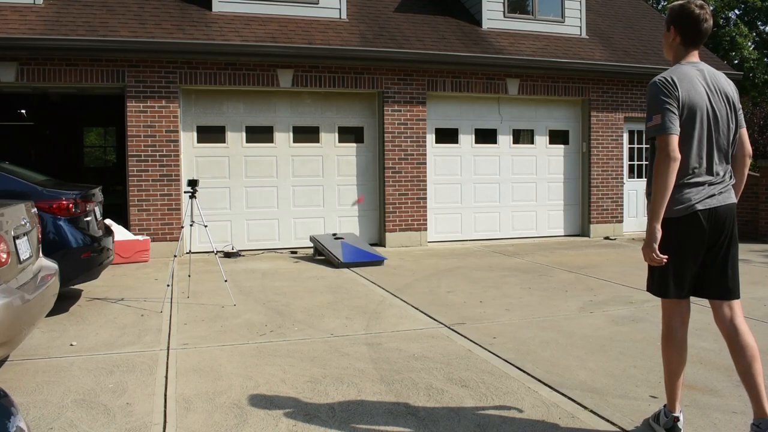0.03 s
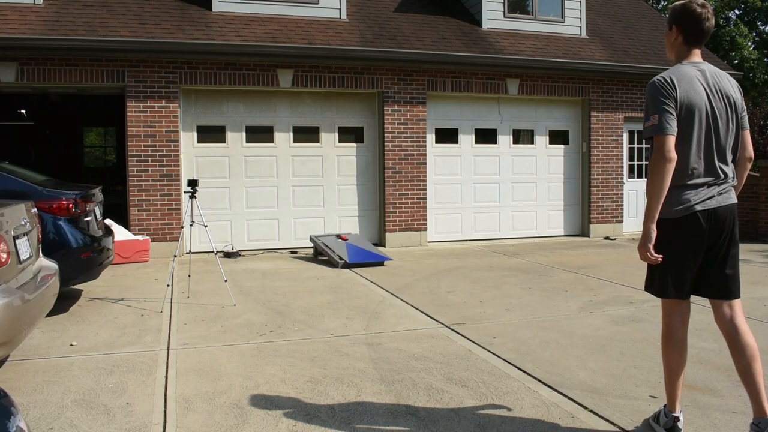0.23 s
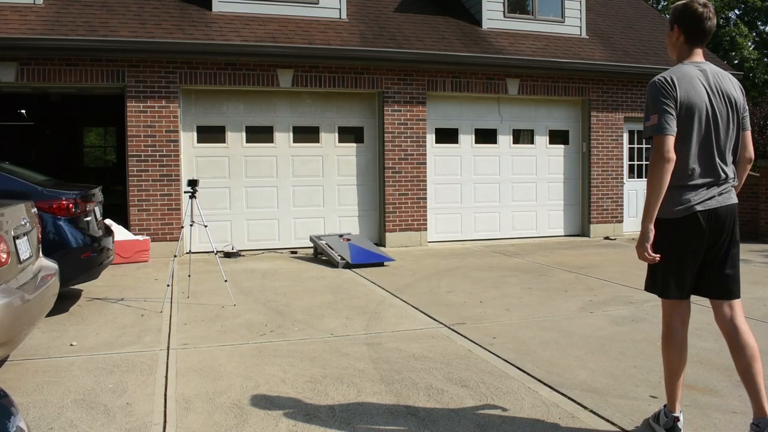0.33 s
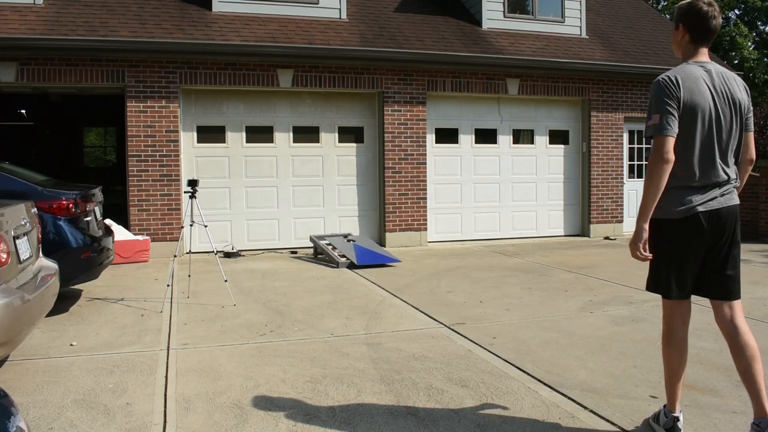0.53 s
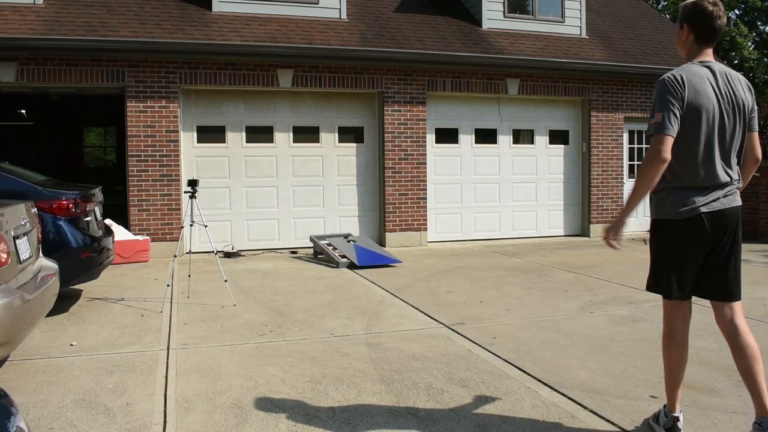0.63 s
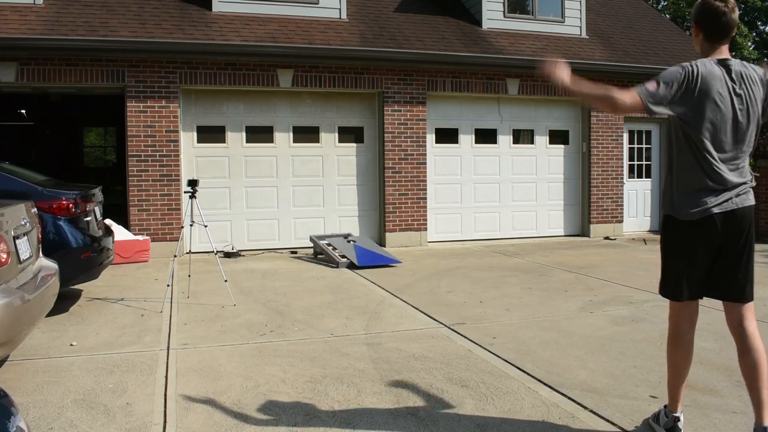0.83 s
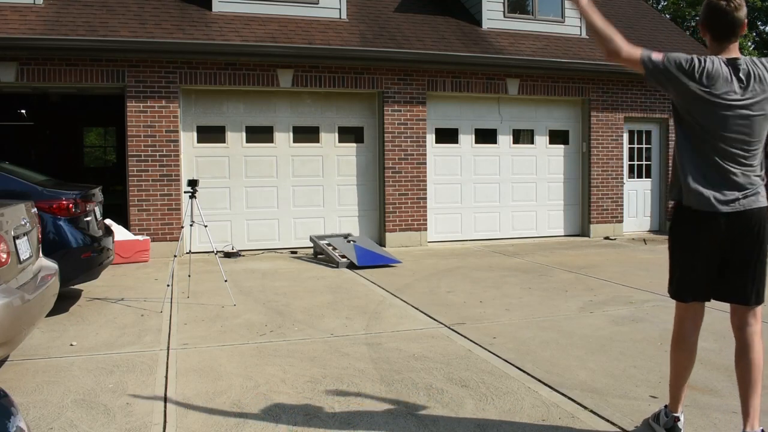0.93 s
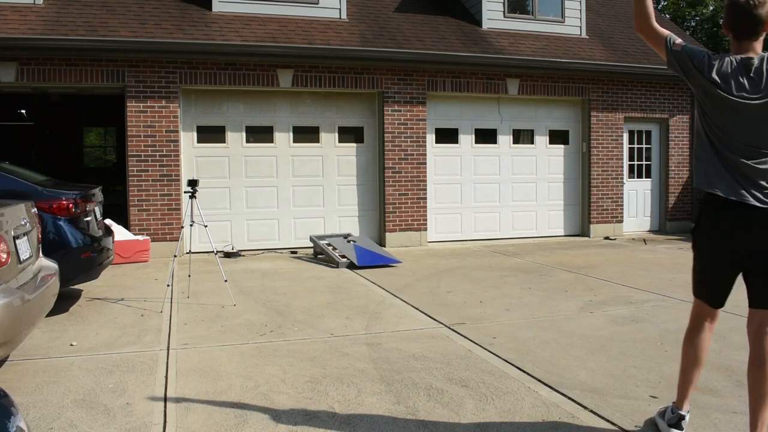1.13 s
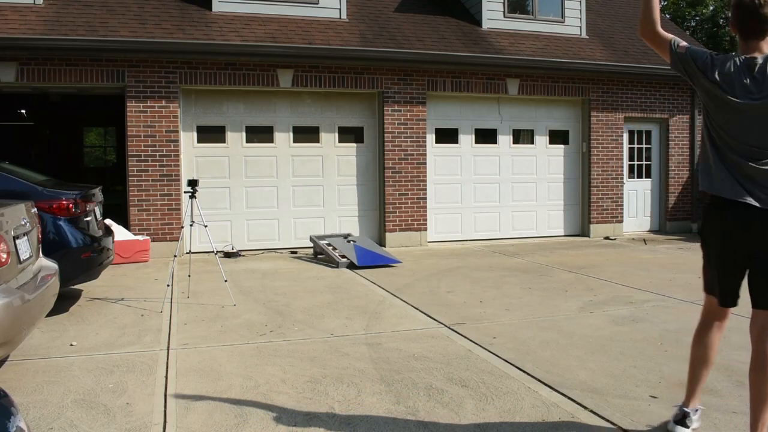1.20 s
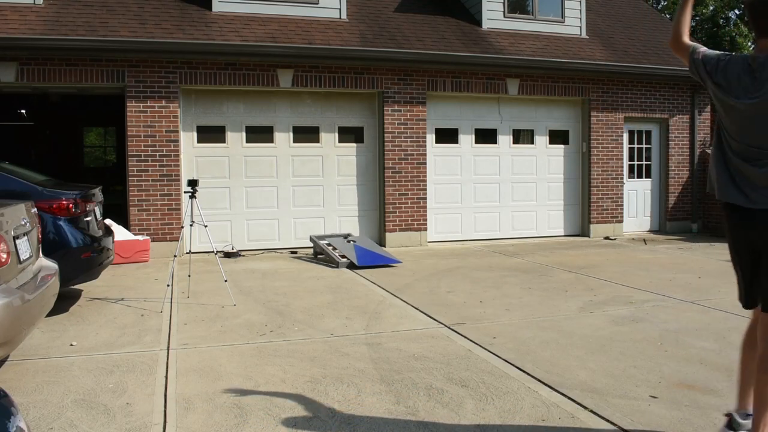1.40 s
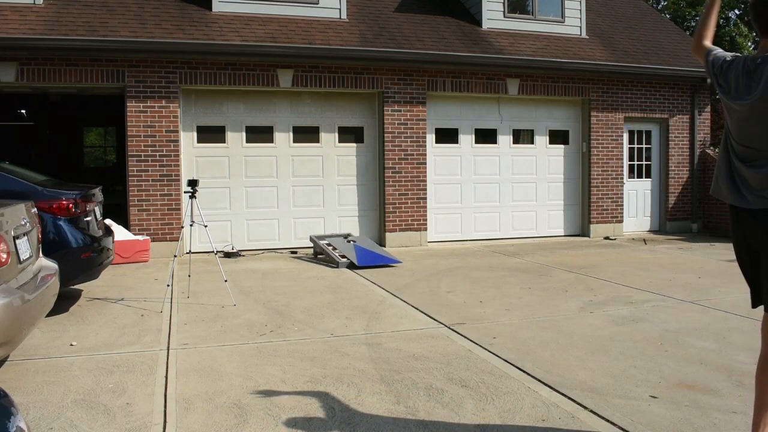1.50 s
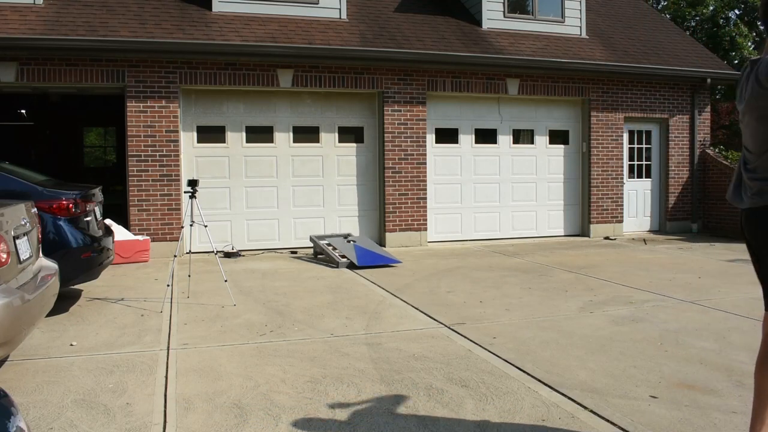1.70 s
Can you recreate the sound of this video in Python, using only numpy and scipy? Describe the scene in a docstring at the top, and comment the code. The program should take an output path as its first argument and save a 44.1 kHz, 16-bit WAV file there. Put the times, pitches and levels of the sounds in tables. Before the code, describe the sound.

A bean bag lands on a hollow wooden board with a sharp slap that echoes briefly off a house. Softer knocks and a short slide follow, then faint distant birds and two soft footsteps in quiet driveway air.

```python
"""Over quiet outdoor air, a bean bag slaps a hollow wooden board on a driveway: the cloth cracks,
the filling thuds, the board rings and the house front answers. Softer knocks follow, pellets tick
and the bag slides briefly. As the knocks end, small birds start whistling far off.
Shoes pad softly twice, and the air sinks away."""
import sys
import numpy as np
from scipy import signal
from scipy.fft import rfft, irfft, next_fast_len
from scipy.io import wavfile
from scipy.ndimage import uniform_filter1d, minimum_filter1d, map_coordinates

SR = 44100
rng = np.random.default_rng(int(sys.argv[2]) if len(sys.argv) > 2 else 0)


def waveform_to_disk(signal):
    """Save audio, clipped to [-1, 1], as 16-bit WAV at the path in sys.argv[1]."""
    frames = np.transpose(np.atleast_2d(signal))
    scaled = np.clip(frames, -1, 1) * 32767
    samples = np.round(scaled).astype(np.int16)
    wavfile.write(sys.argv[1], SR, samples)


N = 77175
TIME_S = np.arange(N) / SR


def amp(db):
    """Decibels to gain."""
    return 10 ** (np.asarray(db) / 20)


def unit_rms(x):
    """Scale to rms 1."""
    return x / np.sqrt(np.mean(x ** 2) + 1e-20)


def along(points, hz):
    """Interpolate (freq_hz, value) points on a log axis."""
    freq_hz, values = np.transpose(points)
    return np.interp(np.log(hz + 1), np.log(freq_hz + 1), values)


def bell(f, hz, width_oct):
    """Gain of a Gaussian band around hz."""
    return np.exp(-.5 * (np.log2((f + 1) / hz) / width_oct) ** 2)


def wobble(rate_hz):
    """Smooth random curve, rate_hz knots a second."""
    return map_coordinates(rng.standard_normal(1024), [TIME_S * rate_hz], mode="wrap")


def filtered(x, gain):
    """Zero-phase filter with response gain(f)."""
    size = next_fast_len(len(x) + SR // 4)
    return irfft(rfft(x, size) * gain(np.fft.rfftfreq(size, 1 / SR)), size)[:len(x)]


def noise(gain):
    """Coloured noise, rms 1."""
    return unit_rms(filtered(rng.standard_normal(N), gain))


def delayed(x, start_s):
    """Shift x to start_s."""
    return np.pad(x, (round(start_s * SR), 0))[:N]


# Rush envelope: time_s, level_db
RUSH_ENVELOPE = [(0, -46.5), (.2, -47), (.65, -45.5), (.9, -50.5), (1.32, -50.5), (1.47, -53), (1.6, -56),
                 (1.75, -61)]
# Rush spectrum: freq_hz, gain_db
RUSH_SPECTRUM = [(25, -29.5), (100, -8), (200, -1.5), (430, -7), (700, -3), (1000, -2), (1440, -8),
                 (2200, -14), (3500, -18.5), (6500, -23.5), (8500, -24.5), (10000, -30), (16000, -42.5)]
# Rumble spectrum: freq_hz, gain_db
RUMBLE_SPECTRUM = [(20, -29.5), (40, -10.5), (65, -3.5), (100, 1.5), (140, -8), (300, -35), (1000, -61)]
# Hum and hiss: pitch_hz, width_oct, level_db, fade_start_s, fall_db_per_s
FADING_BANDS = [(370, 0.059, -50.5, 0.69, 92), (8800, 0.17, -63.5, 0.59, 48)]
def air():
    """Outdoor rush and low rumble sink together; a faint hum and high hiss fade early."""
    rush_db = np.interp(TIME_S, *np.transpose(RUSH_ENVELOPE))
    rush = amp(rush_db + 0.69 * wobble(rate_hz=15)) * noise(lambda f: amp(along(RUSH_SPECTRUM, f)))
    rumble_db = -60.5 + 0.39 * (rush_db - rush_db.mean())
    out = rush + amp(rumble_db) * noise(lambda f: amp(along(RUMBLE_SPECTRUM, f)))
    for pitch_hz, width_oct, level_db, fade_start_s, fall_db_per_s in FADING_BANDS:
        fall_db = fall_db_per_s * np.maximum(TIME_S - fade_start_s, 0)
        out += amp(level_db - fall_db) * noise(lambda f: bell(f, pitch_hz, width_oct))
    return out


# Echo decay: freq_hz, t60_s
YARD_DECAY = [(100, 0.31), (330, 1), (700, 0.66), (1500, 0.5), (4000, 0.71), (8000, 0.41), (14000, 0.43)]
# Echo spectrum: freq_hz, gain_db
YARD_SPECTRUM = [(60, -9), (150, 5), (300, 0.5), (450, -4), (800, -6.5), (1500, -1), (3000, -1),
                 (5500, 1.5), (8000, -6.5), (12000, 0.5), (16000, -15.5)]
def yard(rise_s=0.0019):
    """Diffuse impulse response of house front and driveway; the low mids last longest."""
    hz, frame_s, spectra = signal.stft(rng.standard_normal(SR), SR, nperseg=256)
    decay = amp(-60 * frame_s / along(YARD_DECAY, hz)[:, None])
    _, tail = signal.istft(spectra * decay, SR, nperseg=256)
    tail *= 1 - np.exp(-TIME_S[:len(tail)] / rise_s)
    tail = np.pad(tail / np.linalg.norm(tail), (0, N))[:N]
    return filtered(tail, lambda f: amp(along(YARD_SPECTRUM, f)))


def echoed(x, echo_db):
    """Direct sound plus yard echo."""
    return x + amp(echo_db) * signal.fftconvolve(x, yard())[:N]


# Whistles: start_s, length_s, start_hz, middle_hz, end_hz, level_db
BIRD_WHISTLES = [(0.806, 0.17, 7400, 7480, 7400, -64), (0.823, .1, 9020, 9100, 8460, -62),
                 (0.984, 0.068, 8460, 8700, 8360, -56), (1.026, 0.087, 7960, 8120, 7700, -59.5),
                 (1.171, 0.091, 8420, 8230, 7900, -61.5), (1.308, 0.096, 8100, 8050, 8120, -63),
                 (1.475, 0.12, 8180, 8290, 8210, -62.5), (1.62, 0.16, 8150, 8110, 7950, -68)]
def birds(waver_hz=58.8, flutter_db=3.5):
    """Thin wavering whistles, smeared by distance."""
    out = np.zeros(N)
    for start_s, length_s, start_hz, middle_hz, end_hz, level_db in BIRD_WHISTLES:
        progress = np.clip(TIME_S / length_s, 0, 1)
        contour = np.polyfit([0, .5, 1], [start_hz, middle_hz, end_hz], 2)
        pitch_hz = np.polyval(contour, progress) + waver_hz * wobble(rate_hz=209)
        swell = np.sqrt(np.abs(np.sin(np.pi * progress)))
        envelope = swell * amp(level_db + flutter_db * wobble(rate_hz=73.6))
        out += delayed(envelope * np.sin(2 * np.pi * np.cumsum(pitch_hz) / SR), start_s)
    return echoed(out, echo_db=-2)


# Footfalls: start_s, level_db, pitch_hz
FOOTFALLS = [(1.312, -49, 756), (1.44, -48.5, 430)]
def steps(rise_s=0.0073, width_oct=0.38):
    """Shoes pad lightly on concrete."""
    pulse = TIME_S / rise_s * np.exp(1 - TIME_S / rise_s)
    out = np.zeros(N)
    for start_s, level_db, pitch_hz in FOOTFALLS:
        out += delayed(amp(level_db) * pulse * noise(lambda f: bell(f, pitch_hz, width_oct)), start_s)
    return out


# Friction spectrum: freq_hz, gain_db
SLIDE_SPECTRUM = [(1500, 0.5), (4500, -6.5), (8500, -4), (12000, -15), (16000, -36)]
def slide(peak_s=.53, width_s=0.034, level_db=-45.5):
    """Cloth brushes over the wood."""
    swell = np.exp(-.5 * ((TIME_S - peak_s) / width_s) ** 2)
    return amp(level_db) * swell * noise(lambda f: amp(along(SLIDE_SPECTRUM, f)))


# Cloth and pellet snaps: start_s, level_db, t60_s, pitch_hz, width_oct, echo_db
BAG_SNAPS = [(.0455, -42.5, 0.028, 7600, 0.28, -4), (0.2025, 3.5, 0.013, 7900, 0.15, -6),
             (.2160, -16, .05, 8000, 0.32, -12), (0.367, -37, 0.042, 6900, 0.46, -12),
             (0.3822, -29, 0.023, 7200, 0.22, 2), (0.453, -38, 0.035, 5450, 0.64, -28),
             (0.836, -43.5, 0.052, 4460, 0.53, -22), (0.934, -53.5, .08, 2970, 0.72, -6),
             (1.002, -55, .06, 4800, 0.94, -16.5), (1.645, -60.5, 0.03, 7300, 0.38, -15.5)]
def snaps(rise_s=0.00013, skirt_db=-12):
    """Cloth slaps and pellets click in short bright bursts; each leaves a hiss in the yard."""
    out = np.zeros(N)
    for start_s, level_db, t60_s, pitch_hz, width_oct, echo_db in BAG_SNAPS:
        skirt = lambda f: amp(skirt_db) / (1 + (f / pitch_hz) ** 2.7)
        band = lambda f: unit_rms(bell(f, pitch_hz, width_oct) + skirt(f))
        envelope = amp(level_db - 60 * TIME_S / t60_s) * (1 - np.exp(-TIME_S / rise_s))
        burst = envelope * noise(band)
        echo = amp(echo_db) * np.linalg.norm(envelope) * filtered(yard(), band)
        out += delayed(burst + echo, start_s)
    return out


# Filling spectrum: freq_hz, gain_db
THUD_SPECTRUM = [(30, -34.5), (70, -23.5), (140, -19), (300, 0.5), (700, -4), (1400, -3.5), (2400, -9.5),
                 (4000, -11.5), (8000, -1), (15000, -38)]
def filling_thud(hold_s, lowpass, rise_s=0.0002, t60_s=.045):
    """The filling crushes for hold_s, then comes to rest."""
    attack = 1 - np.exp(-TIME_S / rise_s)
    release = amp(-60 * np.maximum(TIME_S - hold_s, 0) / t60_s)
    return attack * release * noise(lambda f: amp(along(THUD_SPECTRUM, f)) * lowpass(f))


# Board modes: pitch_hz, relative_db, t60_s
BOARD_MODES = [(139.6, -21.5, 0.3), (230.8, -10, 0.21), (318.4, 1.5, .2), (376.2, -12.5, 0.24),
               (456, 0.5, 0.25), (532.7, 3, 0.18), (635, -4.5, 0.11), (805, -3, 0.03), (872, 0, 0.2),
               (980, -6.5, 0.18), (1185, -0.5, 0.19), (1517, 0, 0.048), (1810, -2.5, 0.092),
               (2260, -2.5, .07)]
def board_ring(lowpass, linewidth_hz=19):
    """Decaying modes of the hollow board; they wander as the bag shifts its weight."""
    pitch_hz, relative_db, t60_s = np.transpose(BOARD_MODES)
    weights = amp(relative_db + rng.standard_normal(len(pitch_hz))) * lowpass(pitch_hz)
    walk = np.cumsum(rng.standard_normal((len(pitch_hz), N)), axis=1)
    drift_rad = uniform_filter1d(walk, size=200, axis=1) * np.sqrt(2 * np.pi * linewidth_hz / SR)
    decay = amp(-60 * TIME_S / t60_s[:, None])
    modes = decay * np.sin(2 * np.pi * pitch_hz[:, None] * TIME_S + drift_rad)
    return (weights / np.linalg.norm(weights)) @ modes


# Bag on board: start_s, level_db, cutoff_hz, hold_s, echo_db
BAG_CONTACTS = [(0.0442, -36.5, 1600, 0.0059, -1), (0.2052, -16, 5300, 0.0077, -2.5),
                (0.216, -13, 3420, 0.013, -4), (0.3578, -23, 1227, .013, -1),
                (0.4357, -30, 1730, 0.014, -7), (0.5693, -33, 1174, 0.018, -9.5),
                (0.7237, -34.5, 1173, 0.0085, -22), (0.7342, -31.5, 950, 0.012, -10.5),
                (0.806, -42.5, 950, 0.038, -11)]
def knocks(ring_db=0.5):
    """Each contact thuds and rings the board; softer ones are duller."""
    out = np.zeros(N)
    for start_s, level_db, cutoff_hz, hold_s, echo_db in BAG_CONTACTS:
        lowpass = lambda f: 1 / np.sqrt(1 + (f / cutoff_hz) ** 5.55)
        blow = filling_thud(hold_s, lowpass) + amp(ring_db) * board_ring(lowpass)
        out += delayed(echoed(amp(level_db) * blow, echo_db), start_s)
    return out


def scene():
    """All sources at one microphone."""
    return (knocks() + snaps() + slide() + steps() + birds() + air())[None]


def record(dry):
    """A fast limiter holds the crack down; a steep low-pass follows."""
    ceiling, window_samples, cutoff_hz = .93, 25, 15800
    envelope = np.abs(signal.hilbert(dry[0]))
    needed_gain = np.minimum(1, ceiling / (envelope + 1e-9))
    gain = uniform_filter1d(minimum_filter1d(needed_gain, window_samples), window_samples)
    return filtered(dry[0] * gain, lambda f: 1 / np.sqrt(1 + (f / cutoff_hz) ** 160))[None]


dry = scene()
out = record(dry)
waveform_to_disk(out)
```